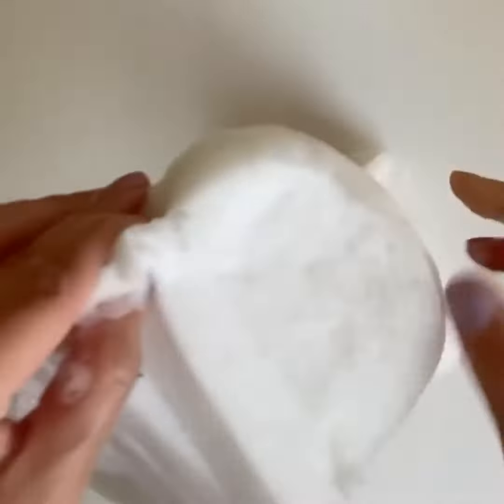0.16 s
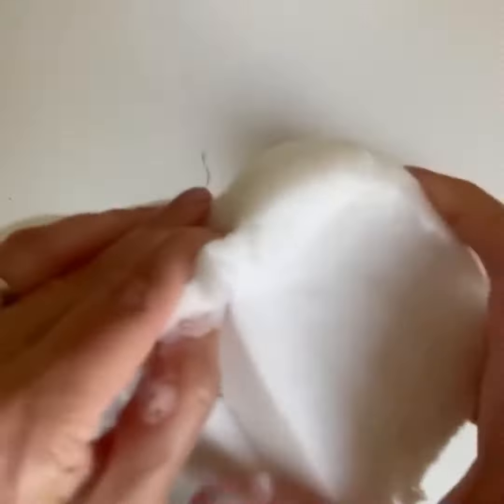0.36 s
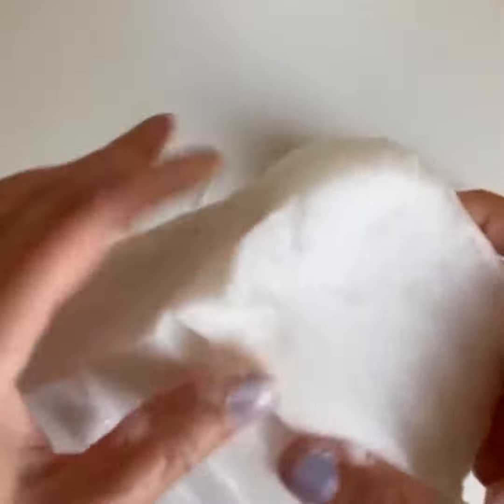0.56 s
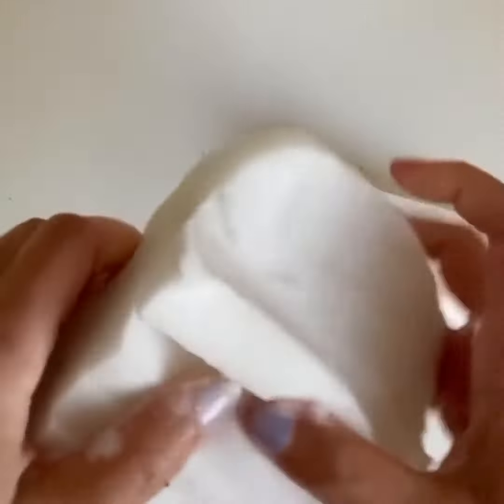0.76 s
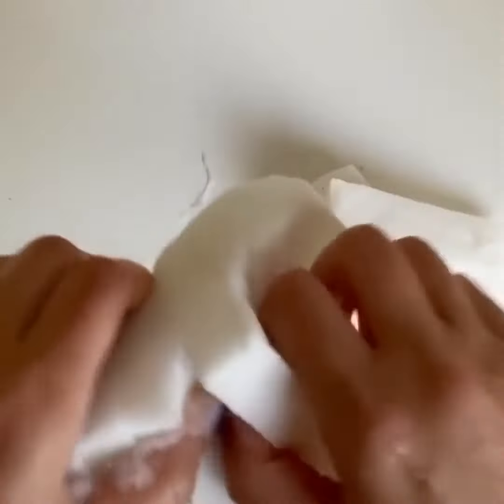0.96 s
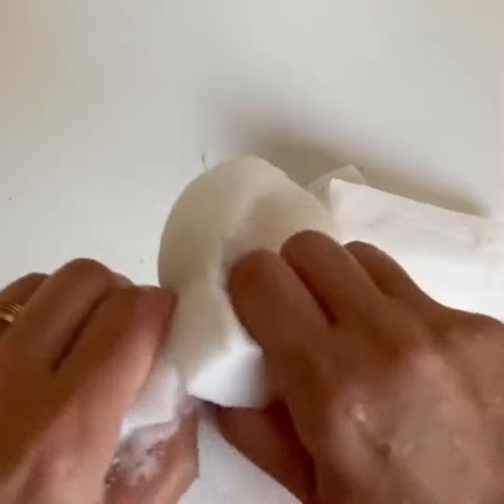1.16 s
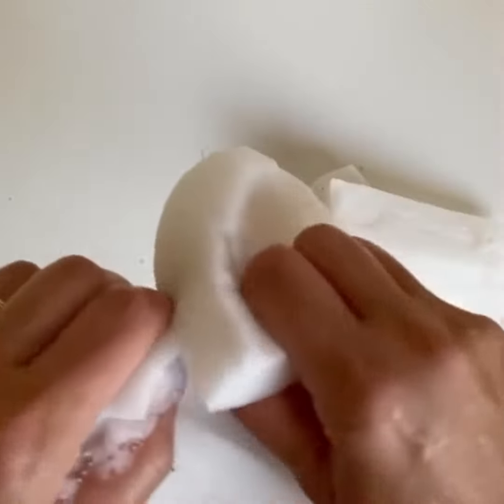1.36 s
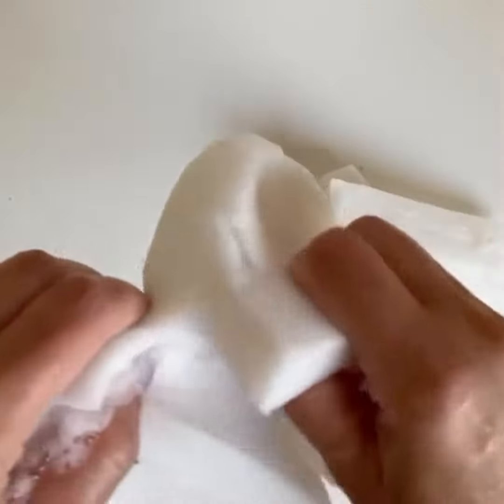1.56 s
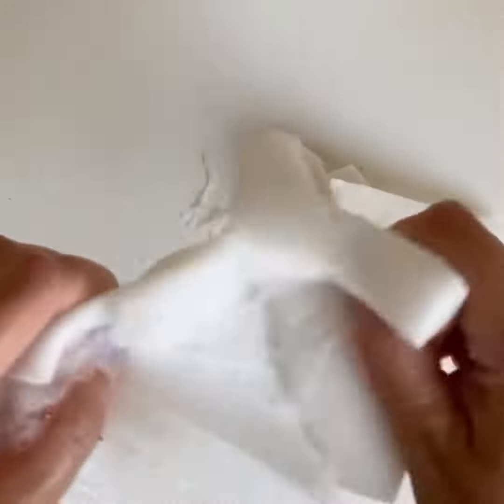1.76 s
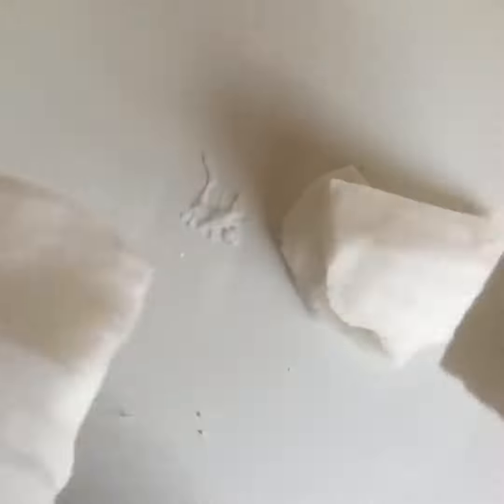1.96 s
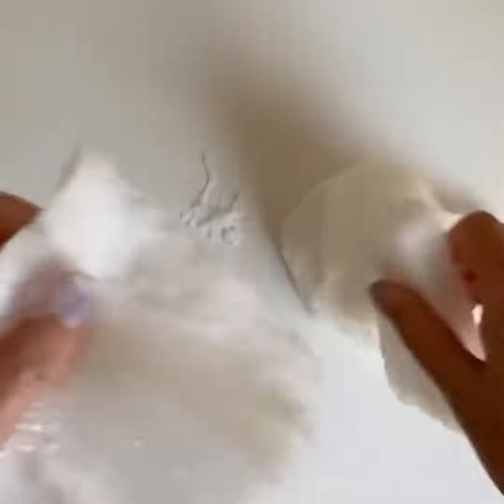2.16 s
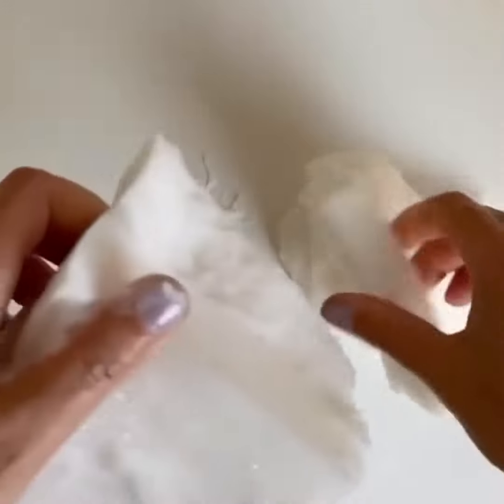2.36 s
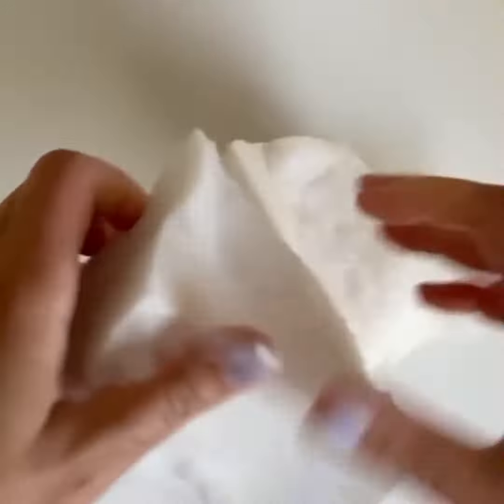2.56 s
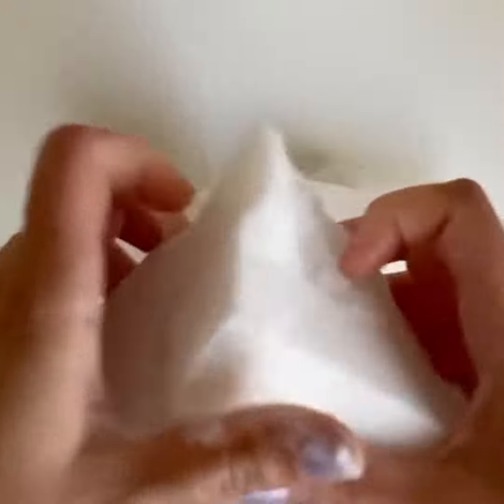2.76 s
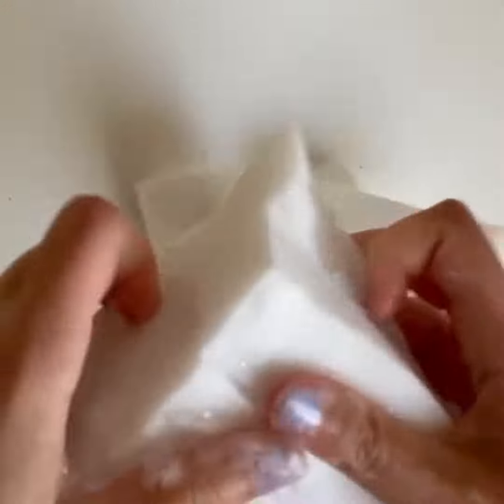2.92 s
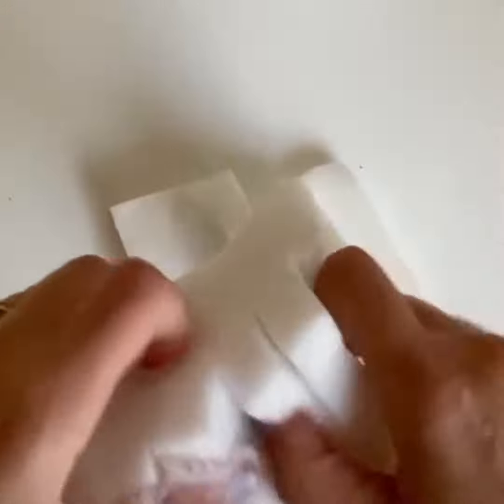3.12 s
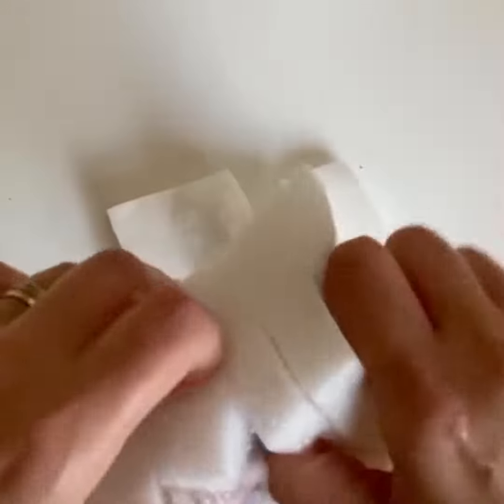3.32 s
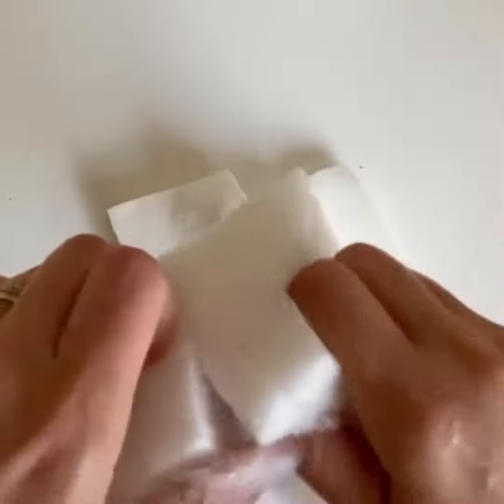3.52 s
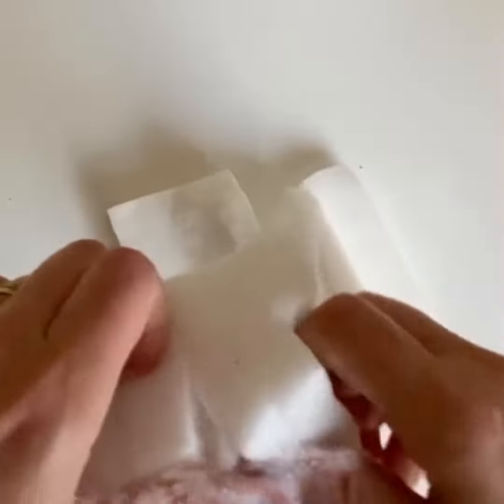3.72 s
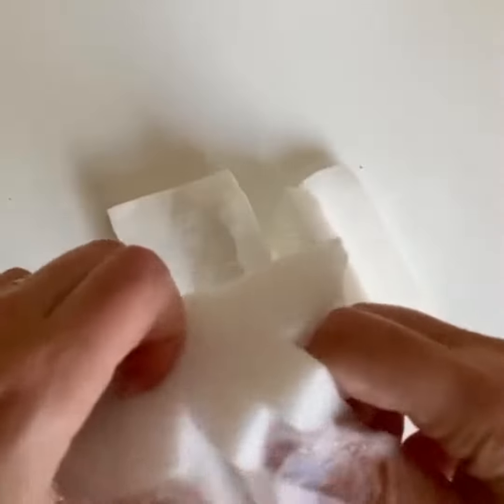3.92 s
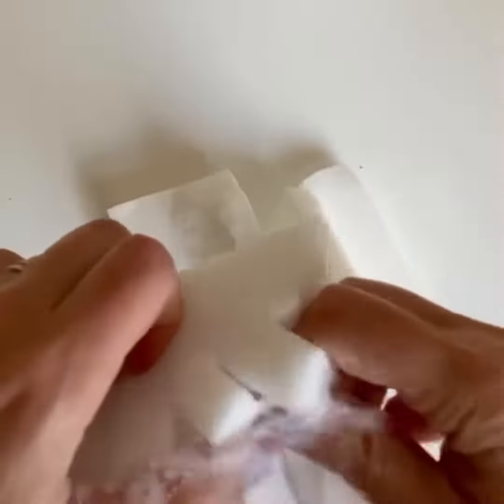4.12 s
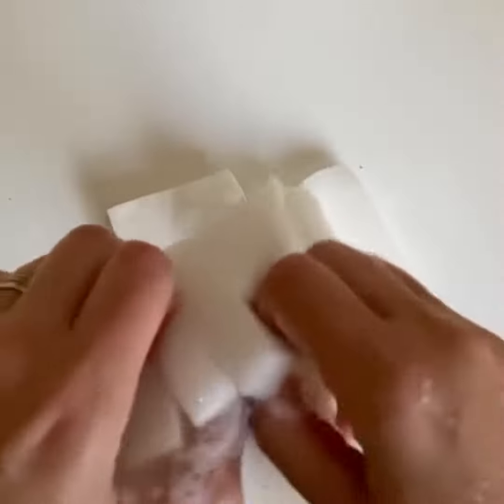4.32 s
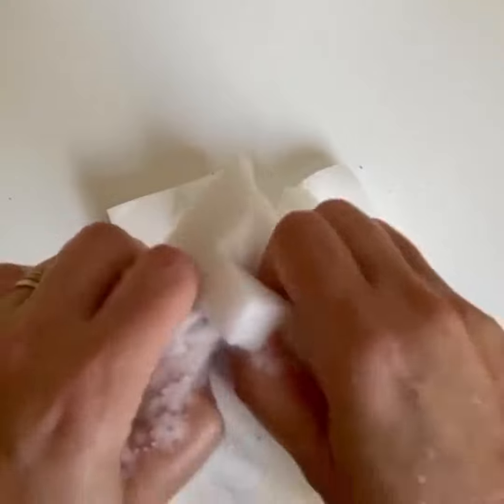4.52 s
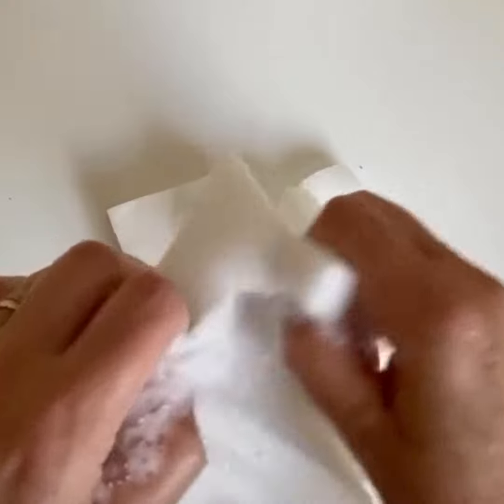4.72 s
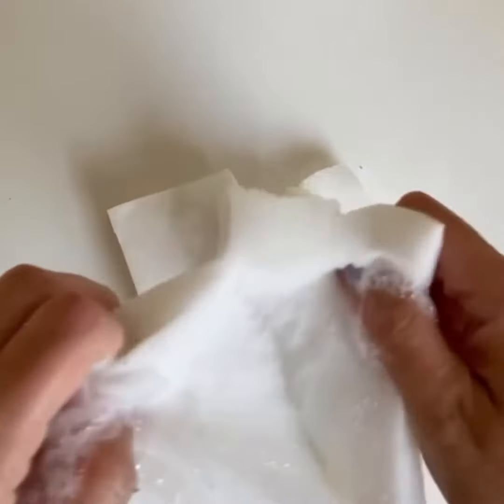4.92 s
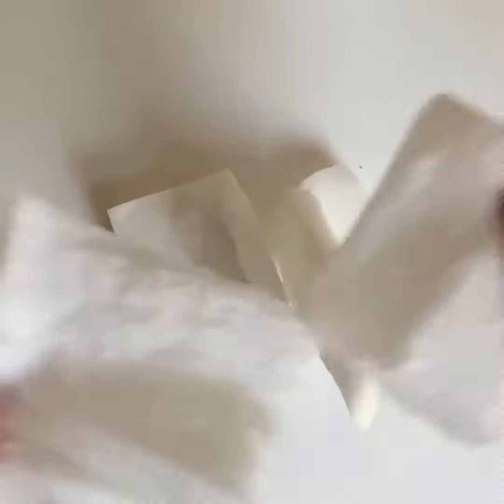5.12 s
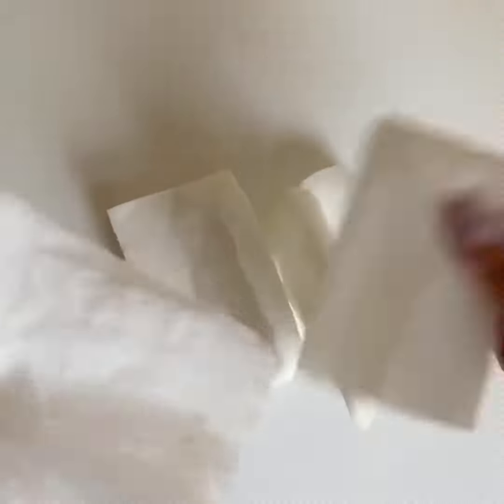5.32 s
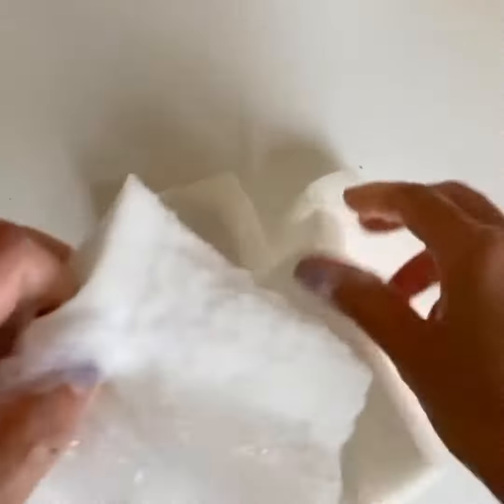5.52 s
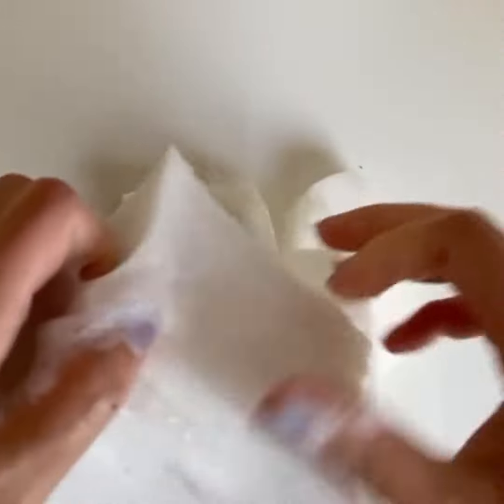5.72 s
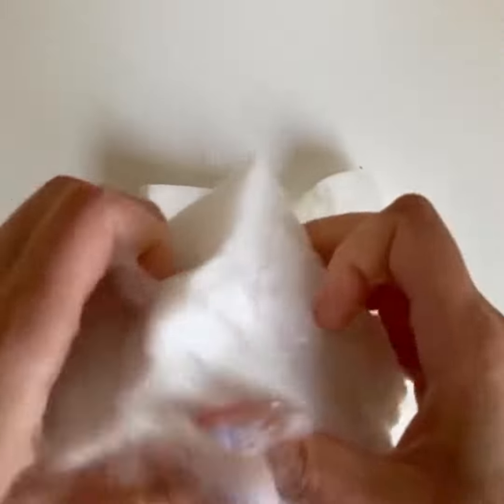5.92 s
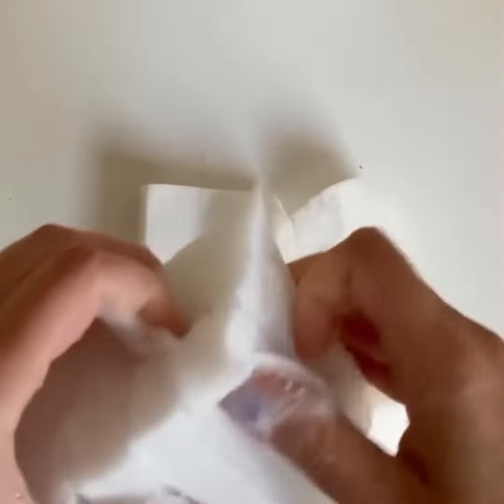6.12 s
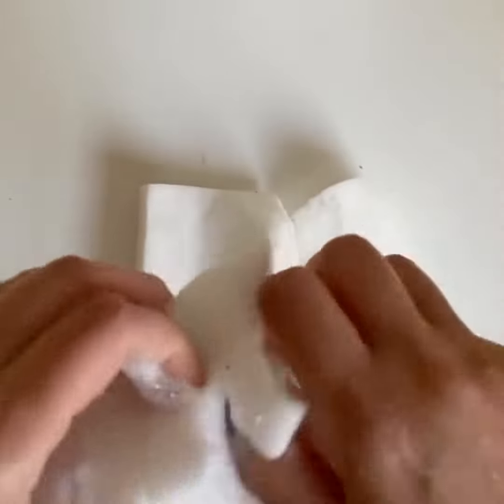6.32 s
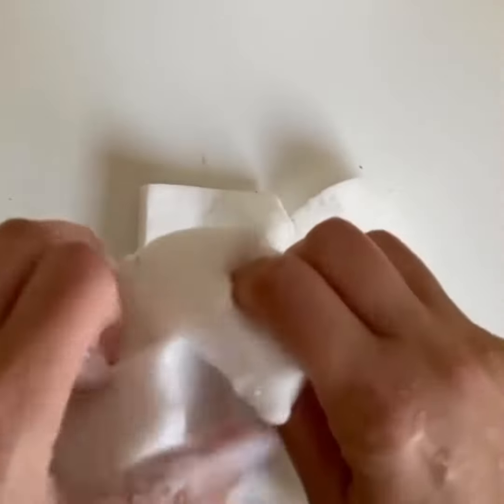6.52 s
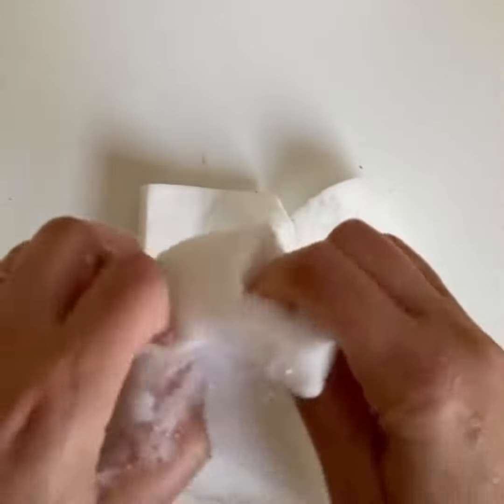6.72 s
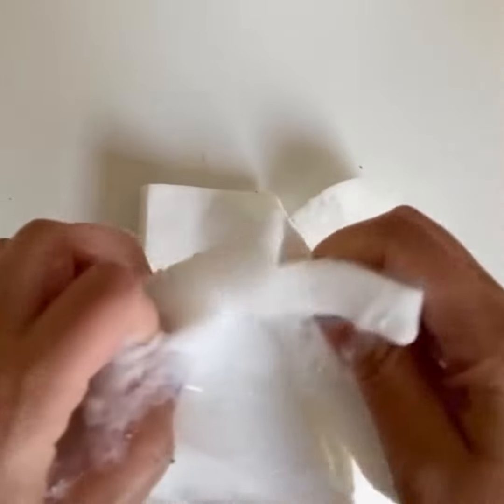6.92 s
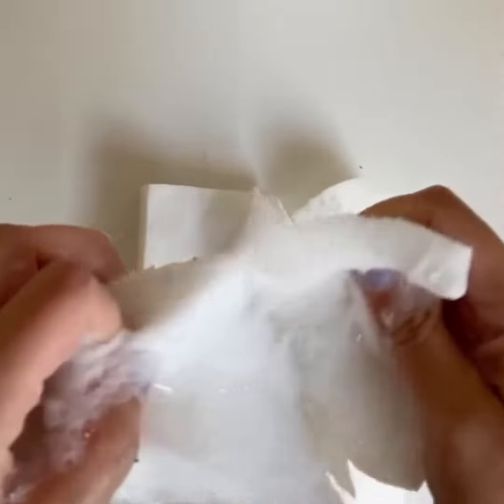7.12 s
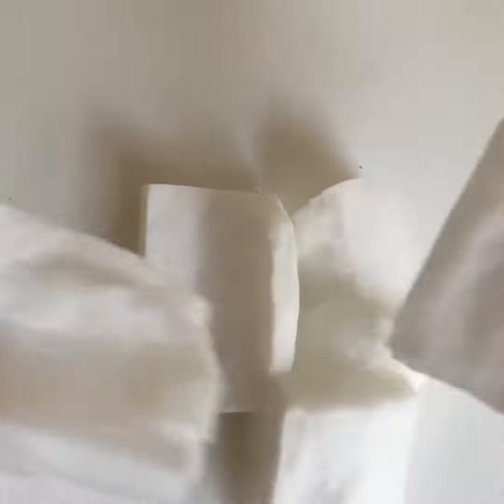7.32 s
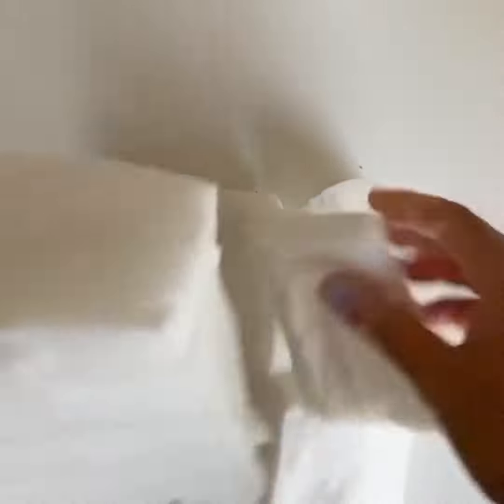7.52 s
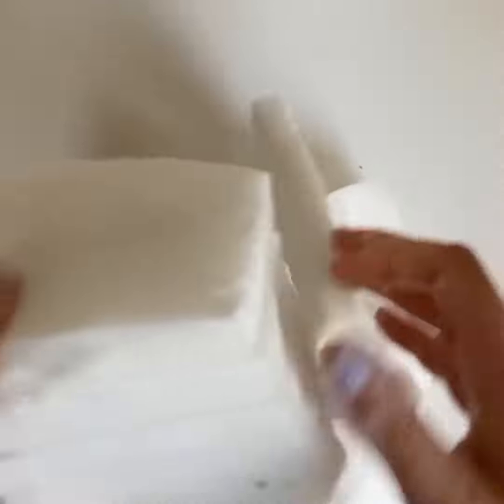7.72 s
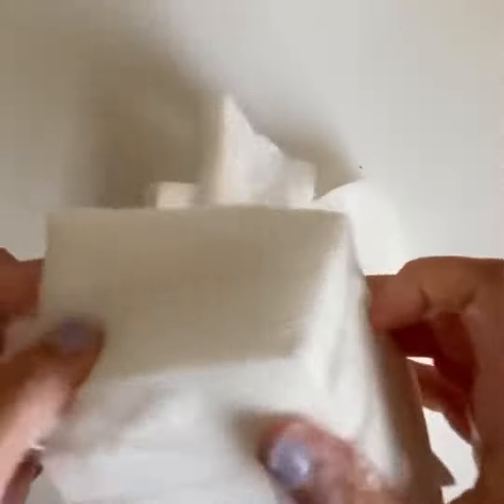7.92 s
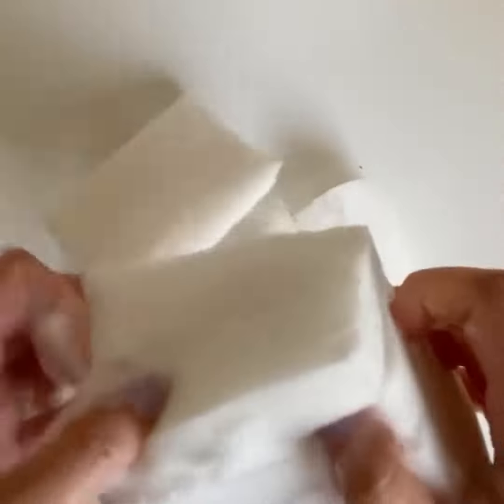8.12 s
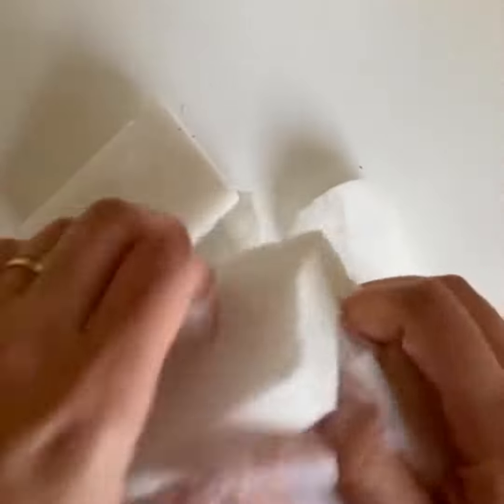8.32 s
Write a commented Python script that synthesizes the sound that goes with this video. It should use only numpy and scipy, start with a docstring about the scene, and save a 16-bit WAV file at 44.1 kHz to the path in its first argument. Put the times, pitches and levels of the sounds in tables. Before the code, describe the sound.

A soapy sponge is handled right under a phone microphone. Light rubbing and crunchy squeezes lead into a growing, gritty tear that bursts into a crisp rip; this happens three times, with quieter squeaky-dry crunches and bubbly fizz between. Thick strands snap as tiny ringing ticks, and the foam flaps and thumps dully. Steady soft low rumble stays underneath, with little room echo; it ends on gentle rubbing and squeezing.

```python
"""Two hands work a soapy foam sponge on a table, close under a phone, over a low appliance rumble and faint hiss.
First they rub and squeeze it: breaking strands crunch, cell walls and suds fizz, the block flaps dully.
Soon thick strands snap as short ringing tones and the block thumps softly. Slow tears begin near 1, 4.3
and 6.5 s; each grows into a rip that parts the block and leaves a brighter fizz for a moment.
Rubbing and squeezing fill the gaps and the end."""
import sys
import numpy as np
from scipy import signal
from scipy.fft import rfft, irfft, next_fast_len
from scipy.io import wavfile
from scipy.ndimage import uniform_filter1d, map_coordinates

SR = 44100
rng = np.random.default_rng(int(sys.argv[2]) if len(sys.argv) > 2 else 0)


def boost_factor(decibels):
    """Convert a level in decibels to a linear amplitude factor."""
    exponent = np.asarray(decibels, float) / 20
    return 10 ** exponent


def master_out(mix):
    """Clip the mix to full scale and print it as 16-bit PCM to the path in sys.argv[1]."""
    frames = np.transpose(np.atleast_2d(mix))
    ceiling = np.clip(frames, -1, 1)
    pcm = np.round(ceiling * 32767).astype(np.int16)
    wavfile.write(sys.argv[1], SR, pcm)


N = 369116

# tone colour of bursting bubbles and fine cell walls: [f/Hz, relative level/dB]
FIZZ_COLOUR = [(1500, -11), (3000, -3.5), (4000, -5.5), (6000, -1), (8200, 2.5), (10000, -3.5), (12000, -9),
               (14000, -8), (15800, -15)]
# tone colour of the hollow between hands, foam and table: [f/Hz, relative level/dB]
HOLLOW_COLOUR = [(400, -10), (800, -9.5), (1150, -2), (1400, -8), (1700, -5.5), (2300, -1.5), (2700, -1),
                 (3100, -8), (3700, -8.5), (6000, -18.5)]
# slow tears, each followed by the rip that parts the block; rows of a pull:
# [t/s, relative crunch level/dB, strand pitch f/Hz]
TEARS_AND_RIPS = [
    [(.993, -53.5, 2450), (1.009, -37, 2480), (1.06, -39, 2258), (1.139, -44.5, 2100), (1.24, -35, 1897),
     (1.347, -37, 1895), (1.44, -36.5, 1880), (1.541, -21.5, 1990), (1.604, -29.5, 2240)],
    [(1.606, -28.5, 2350), (1.62, -17.5, 2344), (1.664, -20, 1936), (1.69, -43, 2090), (1.788, -69, 1700)],
    [(4.335, -54, 2500), (4.36, -37.5, 2490), (4.48, -32.5, 2320), (4.564, -24, 1676), (4.61, -30, 1920),
     (4.65, -34, 1790), (4.665, -24.5, 1956), (4.699, -29.5, 1815), (4.779, -29.5, 2236),
     (4.838, -29.5, 2140)],
    [(4.84, -27, 1810), (4.852, -24.5, 1820), (4.878, -19, 1953), (4.912, -20.5, 1944), (4.955, -29, 1947),
     (5.035, -68, 1714)],
    [(6.45, -50.5, 1600), (6.494, -40, 1500), (6.576, -31.5, 1434), (6.716, -32.5, 1763),
     (6.78, -29.5, 1940), (6.892, -26.5, 2358), (6.954, -29, 2170), (6.985, -26.5, 2160)],
    [(6.987, -23, 1920), (7.0, -21, 1890), (7.06, -17.5, 1800), (7.086, -35.5, 1577), (7.14, -61, 1600)],
]


def unit(x):
    """Scales a sound to an average strength (rms) of 1."""
    return x / np.sqrt(np.mean(x ** 2) + 1e-20)


def along(points, hz):
    """Reads a value off a curve of (Hz, value) points, with pitch on a log axis."""
    f, v = np.transpose(points)
    return np.interp(np.log(hz + 1), np.log(f + 1), v)


def wobble(rate):
    """A smooth random curve through `rate` random points a second."""
    knots = rng.standard_normal(int(N * rate / SR) + 4)
    return map_coordinates(knots, [np.arange(N) * rate / SR])


def filtered(x, response):
    """Makes each pitch in x louder or softer (or turns its phase) as response(Hz) says."""
    m = next_fast_len(N + 8192)
    return irfft(rfft(x, m) * response(np.fft.rfftfreq(m, 1 / SR)), m)[..., :N]


def decaying(t60, size, channels):
    """Noise that dies away like echoes, each pitch falling 60 dB in its own time; energy 1 in the first channel."""
    hz, t, z = signal.stft(rng.standard_normal((channels, size)), SR, nperseg=256)
    fade = boost_factor(-60 * t / along(t60, hz)[:, None])
    tail = signal.istft(z * fade, SR, nperseg=256)[1]
    return tail / np.linalg.norm(tail[0])


def grains(s, hz, cycles, size):
    """Short tones that start at s seconds and die away over some cycles, as a snapped strand rings."""
    k = np.arange(256)
    turn = hz[:, None] * k / SR
    fade = np.exp(-turn / cycles) * (1 - k / len(k))
    wave = size[:, None] * np.sin(2 * np.pi * turn) * fade
    at = (s * SR).astype(int)[:, None] + k
    return np.bincount(at.ravel(), wave.ravel(), N + len(k))[:N]


def crackle(count, scatter_db):
    """Clicks at random moments; positive scatter makes a few much bigger, negative a few much smaller."""
    u = rng.random((count, 3))
    size = boost_factor(-scatter_db * np.log(1 - u[:, 1])) * np.sign(u[:, 2] - .5)
    return unit(np.bincount((u[:, 0] * N).astype(int), size, N))


def patches(x, depth_db, turns, size, count):
    """Gives x random gain and phase over patches of time and pitch: windows of size samples, count bins wide."""
    z = signal.stft(x, nperseg=size)[2]
    field = rng.standard_normal((2, *z.shape))
    field = uniform_filter1d(field, size=count, axis=1)
    field = uniform_filter1d(field, size=6, axis=2)
    gain, phase = field / field.std()
    return signal.istft(z * boost_factor(depth_db * gain) * np.exp(1j * turns * phase), nperseg=size)[1][:N]


def air():
    """Appliance rumble and hiss: shaped noise that swells unevenly, less alike left and right at some pitches."""
    # tone colour of the room's rumble and hiss: [f/Hz, relative level/dB]
    air_colour = [(15, -72.5), (25, -30), (46, -3.5), (69, 0.5), (124, -17), (376, -22.5), (536, -26.5),
                  (589, -32), (922, -22), (1090, -51.5), (1220, -33), (1340, -41), (7000, -53.5),
                  (9100, -88), (15400, -120)]
    # how alike the air sounds left and right: [f/Hz, likeness (1 = same, 0 = unrelated)]
    air_likeness = [(60, 1), (270, 0.73), (700, .1), (1300, 0.21), (2000, 0.53)]

    def mid_and_side(hz):
        turn = np.arccos(np.clip(along(air_likeness, hz), -1, 1)) / 2
        return boost_factor(along(air_colour, hz)) * [np.cos(turn), np.sin(turn)]

    mid, side = filtered(rng.standard_normal((2, N)), mid_and_side)
    swell_db = 1.5 * wobble(6) + 1.5 * wobble(16)
    return boost_factor(-48.5 + swell_db) * unit(np.array([mid + side, mid - side]))


def hands():
    """The power of all hand actions adds up; louder actions count for more in the pitches."""
    # fingers slide and knead between tears: [t/s, relative rub level/dB, relative suds fizz level/dB]
    kneading = [(0, -61, -62.5), (.07, -74, -75.5), (.14, -60, -58), (.4, -55.5, -51), (0.551, -49.5, -48),
                (.79, -56, -53.5), (.83, -58.5, -53.5), (.98, -49, -48.5), (1.76, -63.5, -52.5),
                (1.97, -54.5, -50.5), (2.25, -68.5, -59.5), (2.44, -66.5, -64.5), (2.54, -56.5, -55),
                (2.8, -44.5, -46), (2.95, -46.5, -48), (3.05, -53, -56.5), (3.16, -67.5, -64.5),
                (3.4, -53, -44.5), (3.46, -52, -52), (3.8, -53, -52), (3.93, -53, -53),
                (3.97, -47.5, -45.5), (4.12, -49, -52), (4.16, -53.5, -57.5), (4.33, -48.5, -47.5),
                (5.03, -63.5, -51), (5.29, -53.5, -48.5), (5.33, -66, -72), (5.42, -60.5, -58),
                (5.5, -65, -65), (5.6, -52, -52.5), (5.72, -51.5, -57), (5.95, -45.5, -46),
                (6.06, -51, -56.5), (6.3, -44.5, -47.5), (6.47, -43.5, -35.5), (7.14, -63, -53),
                (7.5, -71, -65), (7.66, -56, -54.5), (7.781, -63.5, -46), (7.84, -44.5, -43.5),
                (8.03, -53, -50), (8.25, -52, -49), (8.37, -45, -48)]
    # a grip catches the foam at once and lets go:
    # [t/s, relative crunch level/dB, time to fall 20 dB/s, fizz over crunch/dB, strand pitch f/Hz]
    catches = [(.112, -51, 0.36, 1.5, 1560), (2.456, -46, 0.11, 1.5, 1700),
               (2.682, -39.5, 0.0817, 0.5, 1380), (3.185, -41, 0.22, -2, 1807),
               (4.19, -40, 0.1951, 0, 1866), (5.615, -51, 0.15, 4, 1700),
               (6.118, -36.5, 0.3444, -2.5, 1463)]
    # a squeeze swells and fades alike; columns as for catches, the sign of the fall time does not matter
    squeezes = [(.25, -48, 0.0281, 7, 1740), (0.299, -47.5, 0.0738, 0, 1582),
                (.615, -45.5, 0.0972, 0, 1645), (.75, -45.5, 0.0571, -2.5, 2163),
                (2.166, -55, 0.06, 0, 2170), (2.37, -55, 0.12, 3, 2075), (2.58, -48, 0.09, -2.5, 1973),
                (2.93, -42.5, 0.04, 2.5, 1640), (3.088, -44, 0.057, -15.5, 2130),
                (3.235, -42.5, 0.0428, 2, 1785), (3.335, -48, 0.04, -15, 1280),
                (3.703, -51, 0.1375, 5, 1680), (3.885, -46, 0.02, -3.5, 1760), (5.1, -53, 0.2, -3, 2335),
                (5.255, -52.5, -0.0671, -4, 2080), (5.644, -46, 0.0433, -11.5, 1810),
                (5.845, -41.5, 0.0618, 3.5, 1640), (5.997, -32.5, 0.056, -14, 1830),
                (6.22, -38, 0.0622, -8, 1400), (7.242, -46, 0.045, -2, 2350), (7.35, -56, 0.0262, 8, 2050),
                (7.415, -56.5, -0.35, -6, 1893), (7.56, -59.5, 0.1, 11.5, 1740),
                (7.73, -48, -0.01, 1, 1296), (7.91, -41.5, 0.1648, -0.5, 1622),
                (8.18, -42.5, 0.1026, -3.5, 1650), (8.325, -39, 0.0962, -5, 1890)]
    # one row for each pull: [fizz over crunch/dB, time until the suds well up/s,
    # dull body over crunch at the start/dB, at the end/dB, body pitch f/Hz]
    pull_colour = [(1, 0.25, -31, -9.5, 530), (5.5, 0.009, -3.5, -9.5, 500),
                   (1.5, 0.114, -31.5, -14.5, 490), (5, 0.0074, -12.5, 8, 700),
                   (4, 0.0099, -28.5, -30.5, 520), (1, .01, -10.5, -8, 550)]

    t = np.arange(0, N / SR, .001)
    s, rub_db, suds_db = np.transpose(kneading)
    rub = np.interp(t, s, rub_db)
    suds = np.interp(t, s, suds_db)
    knead_body = -56 + 0.202 * (rub + 55)  # the dull body follows the rub only a little
    # each action: crunch dB, fizz dB, body dB, strand Hz, body Hz
    actions = [(rub, suds, knead_body, 1800, 200)]

    def add_grip(s, db, rise_s, fall_s, power, fizz_db, hz):
        grip = db - 20 * np.maximum((s - t) / rise_s, (t - s) / fall_s) ** power
        actions.append((grip, grip + fizz_db, grip - 10, hz, 400))

    for s, db, fall_s, fizz_db, hz in catches:
        add_grip(s, db, 0.018, fall_s, 1, fizz_db, hz)
    for s, db, fall_s, fizz_db, hz in squeezes:
        add_grip(s, db, fall_s, fall_s, 1.576, fizz_db, hz)  # the power rounds the top of the swell
    for rows, (fizz_db, wells_s, first_db, last_db, body_hz) in zip(TEARS_AND_RIPS, pull_colour):
        s, db, hz = np.transpose(rows)
        pull = np.interp(t, s, db, left=-200, right=-200)
        dry_db = np.interp(t, [s[0], s[0] + wells_s], [-8, 0])  # less fizz before the suds well up
        body_db = np.interp(t, s[[0, -1]], [first_db, last_db])
        actions.append((pull, pull + fizz_db + dry_db, pull + body_db, np.interp(t, s, hz), body_hz))

    crunch, fizz, body = (np.array([boost_factor(2 * a[k]) for a in actions]) for k in range(3))  # powers
    strand_hz = sum(p * a[3] for p, a in zip(crunch, actions)) / crunch.sum(0)
    body_hz = sum(p * a[4] for p, a in zip(body, actions)) / body.sum(0)
    crunch_db, fizz_db, body_db = (10 * np.log10(p.sum(0)) for p in (crunch, fizz, body))
    return t, crunch_db, fizz_db, body_db, strand_hz, body_hz


def foam_crunch(s, crunch_db, strand_hz, fits):
    """Many strands ring briefly as they break, over a rasp of finer fibres."""
    u, g = rng.random((9000, 2)), rng.standard_normal(9000)
    at = u[:, 0] * N / SR
    pitch = np.clip(np.interp(at, s, strand_hz) * np.exp(.17 * g), 700, 6000)
    strands = unit(grains(at, pitch, 5, boost_factor(-1.8 * np.log(1 - u[:, 1]))))
    fibres = crackle(count=60000, scatter_db=2.0)
    fibres = unit(filtered(fibres, lambda hz: boost_factor(along(HOLLOW_COLOUR, hz))))
    fibres = patches(fibres, 3.79, 0, size=1024, count=1)
    return boost_factor(crunch_db) * unit((0.722 * strands + 0.678 * fibres) * boost_factor(fits))


def suds_fizz(crunch_db, fizz_db, fresh_db, fits):
    """Tiny cell walls and bubbles burst as clicks; harder tearing and fresh faces brighten them."""
    cells = crackle(count=90000, scatter_db=0.5) * boost_factor(0.344 * fits + 0.597 * wobble(40))
    cells = filtered(cells, lambda hz: boost_factor(along(FIZZ_COLOUR, hz)))
    fizz = boost_factor(fizz_db) * unit(patches(cells, 2.07, 0, size=512, count=14))
    top = filtered(fizz, lambda hz: 1 / (1 + (10500 / (hz + 1)) ** 6))
    middle = filtered(fizz, lambda hz: np.exp(-(np.log((hz + 1) / 3800) / 0.166) ** 2))
    # gentle rubbing leaves the larger cells whole: a hollow middle
    middle_gain = boost_factor(0.144 * (crunch_db + 39.5))
    # harder tearing breaks finer cells: brighter
    top_gain = boost_factor(0.208 * (crunch_db + 37.5) + fresh_db)
    return fizz + (middle_gain - 1) * middle + (top_gain - 1) * top


def flapping_body(body_db, body_hz, fits):
    """Dull knocks of the flapping foam; a thinner flap sounds higher."""
    # tone colour of a thick block flapping: [f/Hz, relative level/dB]
    thick_colour = [(30, -20.5), (70, 9.5), (150, 1.5), (280, -3), (400, -2.5), (700, -22)]
    # tone colour of a thin flap: [f/Hz, relative level/dB]
    thin_colour = [(150, -35), (350, 1), (450, -3.5), (700, 0), (900, 0), (1400, -23)]
    flaps = crackle(count=20000, scatter_db=1.5) * boost_factor(1.594 * fits + 0.77 * wobble(10))
    deep, thin = filtered(flaps, lambda hz: boost_factor([along(thick_colour, hz), along(thin_colour, hz)]))
    thin_share = np.clip(np.log(body_hz / 220) / 1.24, 0, 1)
    return boost_factor(body_db) * (np.sqrt(1 - thin_share) * unit(deep) + np.sqrt(thin_share) * unit(thin))


def sponge():
    """The foam gives way in fits: crunch, fizz and body share its stick-slip flutter."""
    s, *curves = hands()
    crunch_db, fizz_db, body_db, strand_hz, body_hz = curves

    def over_time(curve):
        return np.interp(np.arange(N) / SR, s, curve)

    fits = 1.1 * wobble(30) + 1.2 * wobble(70) + 1.1 * wobble(220)
    # a freshly parted face fizzes brighter for a while after each rip
    since = s - np.array([rip[-1][0] for rip in TEARS_AND_RIPS[1::2]])[:, None]
    fresh_db = 9.5 * np.sum((since > 0) * np.exp(-np.abs(since) / 0.33), 0)
    crunch = foam_crunch(s, over_time(crunch_db), strand_hz, fits)
    fizz = suds_fizz(over_time(crunch_db), over_time(fizz_db), over_time(fresh_db), fits)
    return crunch + fizz + flapping_body(over_time(body_db), over_time(body_hz), fits)


def snaps():
    """Each thick strand rings briefly, cracks at its start and sets off a short spray of finer breaks."""
    # thick strands that break one by one: [t/s, relative level/dB, pitch f/Hz]
    thick_strands = [(0.105, -44, 970), (0.797, -27.5, 1420), (0.997, -25.5, 2380), (1.009, -18.5, 2540),
                     (1.614, -12, 2560), (1.629, 3, 3134), (2.451, -30.5, 1700), (2.564, -31, 2080),
                     (2.677, -24.5, 1230), (3.063, -28.5, 1920), (3.084, -24, 2410), (3.103, -25, 2340),
                     (3.332, -29.5, 1030), (3.857, -27.5, 2140), (3.884, -27.5, 2400), (4.185, -36.5, 1530),
                     (4.353, -16.5, 2926), (4.572, -7.5, 1117), (4.661, -14, 1960), (4.672, -14.5, 1510),
                     (4.846, -12.5, 3210), (5.453, -48, 902), (5.91, -28.5, 1150), (6.111, -26.5, 1120),
                     (6.444, -25, 1470), (6.577, -18, 1140), (6.599, -12, 1810), (6.869, -7, 2300),
                     (6.996, -3.5, 2280), (7.043, 4, 1690), (7.249, -31, 2520), (7.556, -32, 1780),
                     (7.722, -36, 1110), (8.147, -43.5, 1690)]
    s, db, hz = np.transpose(thick_strands)
    t = np.arange(SR // 10) / SR
    blows = np.bincount((s * SR).astype(int), boost_factor(db - 17.5), N)
    fade = boost_factor(-60 * t / 0.064)  # falls 60 dB in 0.064 s
    spray = signal.fftconvolve(blows, fade)[:N] * crackle(count=40000, scatter_db=-1.5)
    spray = filtered(spray, lambda f: boost_factor(along(HOLLOW_COLOUR, f)) + boost_factor(along(FIZZ_COLOUR, f) - 6.5))
    ring = grains(s, hz, 4.57, boost_factor(db - 6.5))
    crack = grains(s, 0 * s + 6000, 1.0, boost_factor(db - 3.5))
    return ring + crack + spray


def thumps():
    """A soft low push that sags in pitch and dies without a ring."""
    # the block thumps as it parts or lands: [t/s, relative level/dB, starting pitch f/Hz, time to fall 60 dB/s]
    block_thumps = [(0.728, -30.5, 129, 0.072), (1.529, -19.5, 410.9, 0.064), (1.617, -13, 390.5, 0.054),
                    (1.678, -20.5, 88.8, 0.08), (3.349, -34.5, 148, 0.084), (4.848, -17, 271.9, 0.119),
                    (4.929, -20, 799, 0.056), (5.999, -32, 430, 0.077), (6.218, -31.5, 311, 0.064),
                    (6.998, -18, 631, 0.045), (7.07, -18, 86.1, 0.093), (8.148, -28.5, 151.5, 0.067)]
    out, t = np.zeros(N + SR), np.arange(SR // 4) / SR
    for s, db, hz, t60 in block_thumps:
        push = np.sin(2 * np.pi * hz * t / (1 + 7 * t)) * (1 - np.exp(-t / 0.00284))
        out[round(s * SR):][:len(t)] += boost_factor(db - 60 * t / t60) * push
    return out[:N]


def off_the_table(sound):
    """Echoes off the table top strengthen some pitches of every near sound and weaken others."""
    # tone colour given by the table top: [f/Hz, level change/dB]
    table_colour = [(900, 0), (1130, 2.5), (1600, -0.5), (2030, -0.5), (2220, 0), (2420, 1.5), (2760, -3),
                    (3130, 2.5), (3350, -3), (3550, 0.5), (3800, -3.5), (4200, 0), (4600, -1)]
    return filtered(sound, lambda hz: boost_factor(along(table_colour, hz)))


def room_echo(near):
    """Faint echoes from the room, as two separate noise tails."""
    # how long the room rings: [f/Hz, time to fall 60 dB/s]
    ring_times = [(100, 0.48), (1000, 0.52), (3800, 0.616), (10000, 0.168)]
    tails = decaying(ring_times, size=SR // 2, channels=2)
    return boost_factor(-23.5) * signal.fftconvolve(near[None], tails, axes=1)[:, :N]


def left_and_right(near, room):
    """By pitch, the near sound is alike or opposed left and right, as mid or side is the stronger."""
    # side (opposed left and right) against mid (alike in both), by pitch: [f/Hz, side over mid/dB]
    side_balance = [(100, -22), (300, -15), (600, -11), (1000, -14), (1300, -11), (1600, -23), (1850, -26),
                    (2050, -40), (2400, -24), (2900, -7), (4900, -6), (5300, -34), (6000, -24), (6400, -3),
                    (7200, 5), (7600, 42), (8400, 42), (8650, 15), (9100, 4), (9750, -6), (11000, -9),
                    (11350, -36), (12300, -36), (12700, -2), (13500, 9), (13900, 42), (14800, 30),
                    (15300, 2)]

    def turn(hz):
        return np.arctan(boost_factor(along(side_balance, hz)))

    mid = filtered(near + room[0], lambda hz: np.cos(turn(hz)))
    # the side gets random phase patches, so left and right are less alike
    scattered = patches(near, 0, 1.2, size=256, count=3)
    side = filtered(scattered + room[1], lambda hz: 1j * np.sin(turn(hz)))
    return np.array([mid + side, mid - side])


def scene():
    """Foam, snaps and thumps take on table and room, spread left and right; the room's air lies under them."""
    near = off_the_table(sponge() + snaps() + thumps())
    return left_and_right(near, room_echo(near)) + air()


def top_cut(x):
    """Nothing passes above the cut-off."""
    return signal.sosfilt(signal.butter(12, 16090, fs=SR, output="sos"), x)


def record(dry):
    """The deepest bass is cut away and the highest peaks are rounded off."""
    x = filtered(dry, lambda hz: hz ** 2 / (hz ** 2 + 44 ** 2))
    x = x / (1 + np.abs(x / .8) ** 4) ** (1 / 4)
    return top_cut(x)


dry = scene()
out = record(dry)
master_out(out)
```